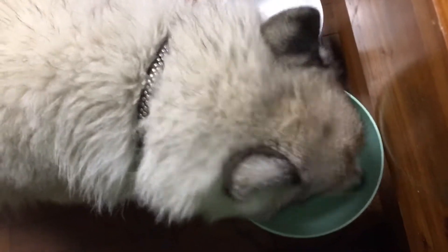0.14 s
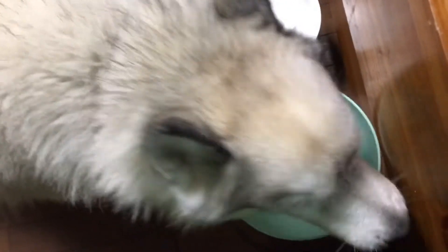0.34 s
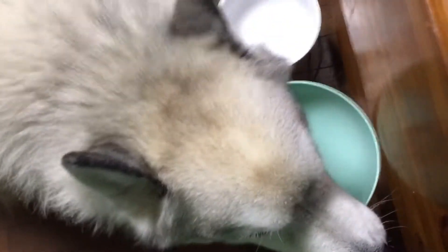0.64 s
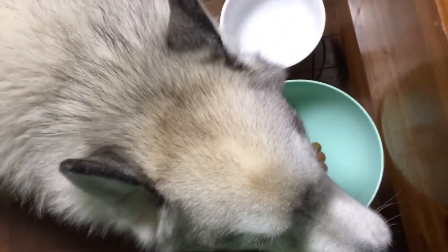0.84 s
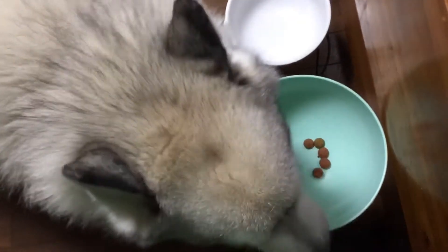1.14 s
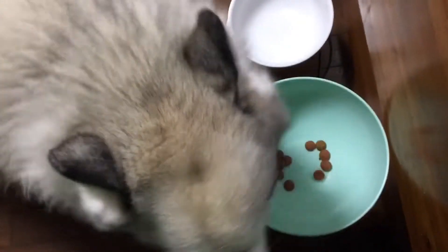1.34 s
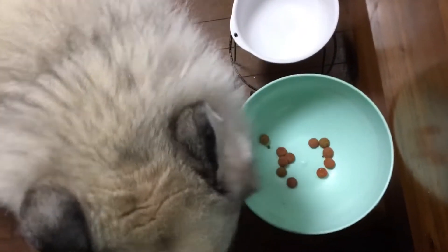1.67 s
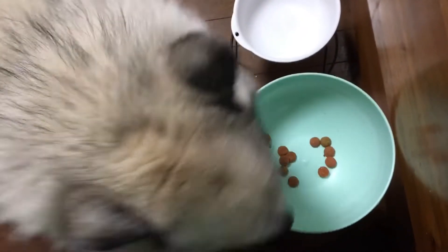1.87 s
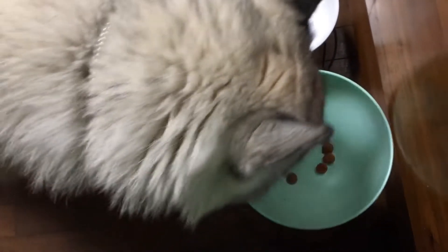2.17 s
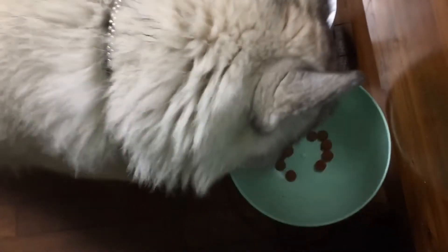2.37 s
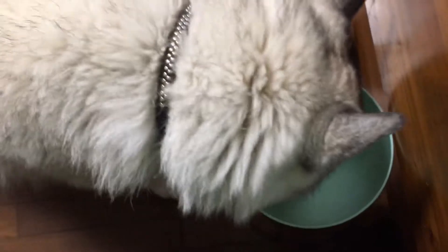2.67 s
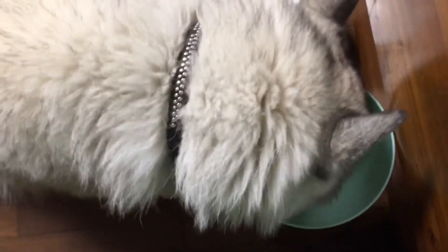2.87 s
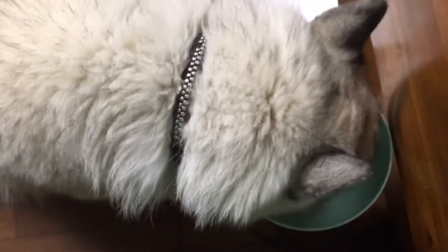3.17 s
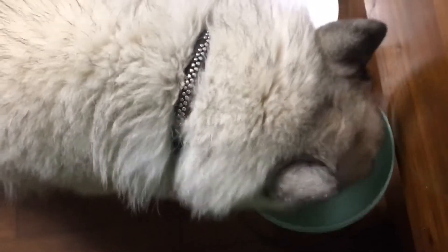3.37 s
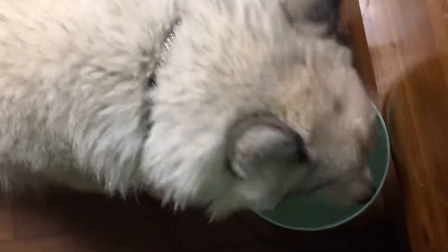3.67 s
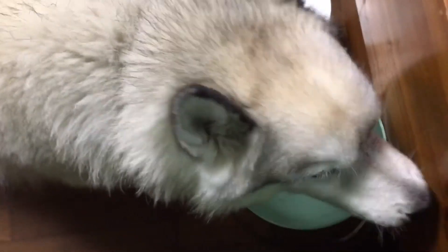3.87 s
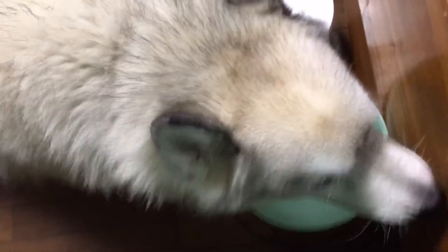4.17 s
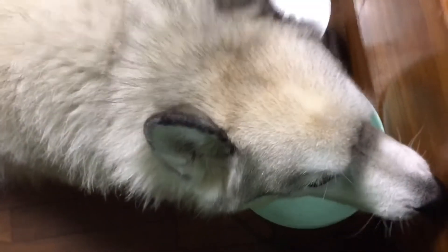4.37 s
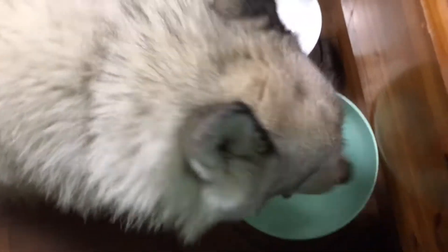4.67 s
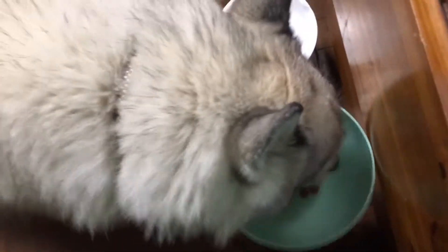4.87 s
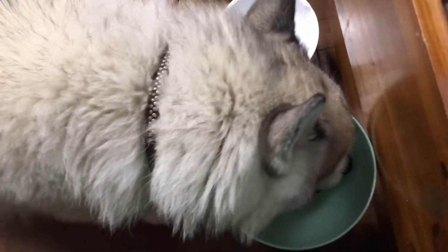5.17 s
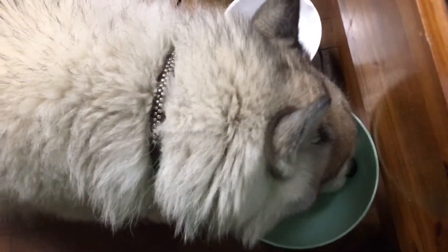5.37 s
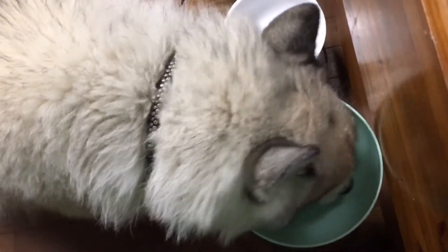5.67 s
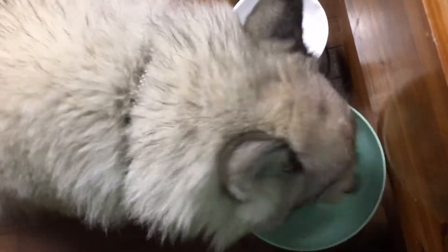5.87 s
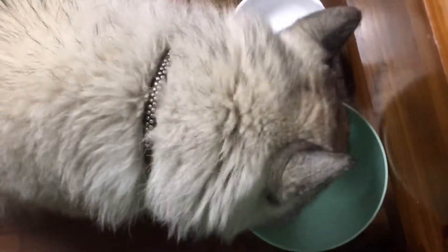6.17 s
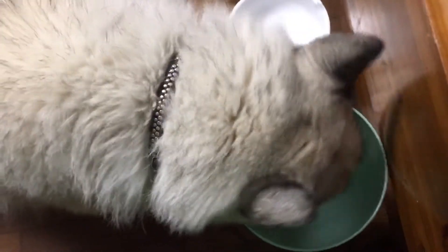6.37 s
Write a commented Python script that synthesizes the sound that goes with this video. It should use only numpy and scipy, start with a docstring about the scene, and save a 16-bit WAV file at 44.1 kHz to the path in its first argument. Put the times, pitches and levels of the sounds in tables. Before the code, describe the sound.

Close, uneven crunching and wet smacking as a dog eats pellets, its bowl and paws knocking on floorboards over a low household rumble.

```python
"""Crumbs grind in a dog's mouth over a low household rumble as it eats dry food from a plastic bowl.
Pellets snap between its teeth and tick in the bowl, each break ringing briefly at two pitches.
Paws and bowl knock the wooden floor and set the boards ringing. Wet tongue and lips click, and
tongue and fur rustle. A small room echoes the snaps, knocks and clicks, all heard through a phone
held just above the bowl."""
import sys
import numpy as np
from scipy import signal
from scipy.fft import rfft, irfft, next_fast_len
from scipy.io import wavfile
from scipy.ndimage import uniform_filter1d

SR = 44100
rng = np.random.default_rng(int(sys.argv[2]) if len(sys.argv) > 2 else 0)


def transcribe(u):
    """Save the signal u as a 16-bit wav file named by the first command-line argument.

    u: samples, shape (n,) or (channels, n), limited to [-1, 1]; the rate is SR.
    q: integer samples, one column per channel.
    """
    v = np.clip(np.atleast_2d(u).T, -1, 1)
    q = np.round(v * 32767).astype(np.int16)
    wavfile.write(sys.argv[1], SR, q)


N = 287091

# How loud the grinding crumbs, the tongue and fur rustle, and the household rumble are over time.
# Each row: time in seconds, level in dB.
GRIND_LEVELS = [(0, -43.5), (.14, -52), (.28, -47), (.45, -60), (.7, -50.5), (.83, -59.5), (1.2, -53),
                (1.55, -57), (2, -59.5), (2.45, -56.5), (2.72, -55.5), (2.8, -55), (3, -48.5),
                (3.12, -58.5), (3.3, -52.5), (3.6, -58), (3.8, -53.5), (4.4, -54.5), (5, -51),
                (5.42, -54.5), (5.6, -51.5), (5.78, -52), (5.92, -49), (6.1, -51), (6.51, -53)]
RUSTLE_LEVELS = [(0, -55.5), (.22, -58), (.33, -66.5), (.52, -59.5), (.64, -56), (.77, -57), (.83, -69),
                 (.92, -55.5), (1.02, -60), (1.12, -54.5), (1.32, -51.5), (1.5, -58.5), (1.88, -56.5),
                 (2, -62.5), (2.2, -60), (2.38, -60.5), (2.52, -64), (2.67, -49), (2.78, -59.5), (2.9, -53),
                 (3.13, -62), (3.35, -49.5), (3.5, -56.5), (3.63, -54.5), (3.72, -61.5), (4.02, -52),
                 (4.18, -51.5), (4.33, -56.5), (4.72, -52.5), (4.95, -51), (5.17, -53.5), (5.3, -50),
                 (5.5, -61.5), (5.7, -48.5), (5.85, -57.5), (6, -52), (6.18, -48), (6.35, -55.5),
                 (6.51, -52)]
RUMBLE_LEVELS = [(0.0, -45), (0.2, -42.5), (0.31, -42), (0.43, -49.5), (1.01, -48.5), (1.34, -48),
                 (1.54, -51.5), (2.21, -51.5), (2.59, -51.5), (2.7, -51), (3.48, -51.5), (3.9, -49),
                 (4.0, -49.5), (4.5, -48), (5.4, -54.5), (6.0, -46), (6.22, -50.5), (6.51, -55)]
# The tone of those three sounds, from bass to treble. Each row: frequency in Hz, relative level in dB.
GRIND_TONE = [(180, -4), (300, 0), (534, 0), (768, 1), (1350, -0.5), (1870, -0.5), (2790, -7), (3010, -5.5),
              (6000, -17), (7800, -43), (13200, -120)]
RUSTLE_TONE = [(880, -12), (1500, -5.5), (1850, -11.5), (2640, -7.5), (3920, -0.5), (4830, -7),
               (6120, -0.5), (7760, -4), (9100, -1.5), (10500, -9), (11400, -5.5), (14900, -11.5),
               (16000, -14)]
RUMBLE_TONE = [(15, -47), (25, 23.5), (37, 13), (54, 1), (65, 8), (82, -3.5), (192, 5.5), (345, -0.5),
               (472, -27), (549, -20), (600, -10), (657, -10), (900, -29), (1170, -59), (1980, -120)]
# The louder pellet snaps. Each row: start in seconds, level in dB, first pitch in Hz, second pitch
# in Hz, then the levels of the second pitch and of the crack, in dB compared with the first pitch.
PELLET_SNAPS = [(.0265, -36.5, 800, 2180, -1, -7), (.1507, -33, 1070, 1950, -21, -20),
                (.1942, -26, 1800, 1060, -0.5, -9), (.2325, -21.5, 1280, 2250, 0.5, -8),
                (.2456, -19, 637, 1180, -2, -8), (.257, -21, 1260, 670, -1, -11),
                (.2757, -31.5, 686, 1770, 3, -22), (.5597, -30.5, 3320, 760, -7, -10),
                (.6158, -39.5, 736, 3330, -3, 5), (.6242, -37, 1110, 2400, -6, -5),
                (.644, -31.5, 1160, 840, -8, -1), (.696, -41, 1160, 2430, -12, 4.5),
                (.7358, -37.5, 1660, 3950, -6, 2.5), (.766, -33.5, 1560, 2400, -2, 0.5),
                (.7731, -38.5, 1440, 3640, 2.5, 0), (.789, -41, 2120, 1390, -4, -1),
                (.8514, -37, 2200, 3770, 2.5, 1.5), (.8712, -33.5, 2460, 1070, -2, -6),
                (.884, -34, 1370, 925, -11, -6), (.9094, -41, 3650, 1420, 4, -2),
                (.9412, -28, 3000, 1910, -24, 3), (.9533, -30.5, 4400, 1230, -2, -5),
                (1.037, -44, 1710, 3000, -14, 10), (1.0648, -30.5, 1600, 824, -8, -4),
                (1.0911, -33.5, 2540, 1400, -18, -1), (1.1122, -30.5, 1590, 2260, -6, -2),
                (1.1416, -25, 1470, 746, -11, -9.5), (1.2975, -35, 1760, 2400, 1, 4.5),
                (1.3364, -35.5, 1410, 2500, -3, -11), (2.2817, -34, 1270, 3080, -3, -1.5),
                (2.2921, -36.5, 1540, 790, -4, -2), (2.4337, -31.5, 3650, 1900, -5, 8),
                (2.541, -40, 1330, 3500, -25, -19), (2.728, -33, 786, 1230, -4, -7),
                (2.733, -31.5, 1760, 1210, -2, -20), (2.7418, -30, 1710, 790, 0.5, -23),
                (2.7496, -29.5, 795, 1790, -7.5, -23), (2.8251, -39.5, 770, 2000, -2, 2),
                (2.8529, -39.5, 686, 1950, 0.5, -8), (2.9167, -38, 1990, 4200, -5, 0),
                (2.9205, -26.5, 1920, 5170, -10, -4.5), (2.9642, -30, 1860, 800, -10, -7),
                (3.0031, -33, 850, 1730, 2, -17), (3.012, -30, 1010, 1880, -15, -17),
                (3.031, -43, 1700, 750, -11, -11), (3.0414, -29, 1940, 960, -1, -6.5),
                (3.05, -30.5, 1010, 1740, -13, -6), (3.1565, -32, 805, 1950, -2.5, -27),
                (3.217, -32.5, 1640, 2620, -3, -5), (3.2245, -36, 736, 1110, -14, -23),
                (3.2278, -21.5, 1590, 800, -9, -3), (3.2471, -37, 810, 1980, 2, -16),
                (3.2572, -39, 1340, 2480, 5.5, 5), (3.289, -40, 1380, 4300, -10, 10.5),
                (3.3242, -28, 1140, 2000, -1, -18), (3.3463, -25, 1580, 1100, 1, -22),
                (3.4058, -32.5, 1080, 1870, -2.5, -8), (3.7137, -37.5, 670, 1170, 3, -17),
                (3.7186, -34, 1070, 666, -7, -10), (3.8292, -33.5, 1330, 960, -26, -3.5),
                (3.9454, -40, 1500, 2220, -9, -1), (4.1185, -22, 2860, 1330, -6, -3.5),
                (4.134, -42, 2200, 1160, -10, -1), (4.268, -39, 1140, 2360, -6, -7),
                (4.405, -33, 2700, 2110, 0.5, 6.5), (4.6404, -37, 1110, 1570, -19, -21),
                (4.7283, -46, 1780, 1220, -1, 10), (4.8734, -39, 725, 1900, -3, -8),
                (5.0796, -37, 3270, 1370, -11, 2), (5.1669, -31.5, 1340, 2170, -9, -20),
                (5.349, -35, 1640, 2970, -4, -4), (5.3574, -29.5, 2150, 2930, -7, -16),
                (5.4397, -38.5, 1100, 2070, -5, 0), (5.4502, -36.5, 2180, 980, -20, -7),
                (5.4862, -31.5, 880, 1570, -8, -9), (5.4987, -31, 1610, 700, -17, -18),
                (5.5128, -35, 2150, 710, -16, -11), (5.5331, -21, 2000, 1520, -23, -14),
                (5.536, -12.5, 2410, 1700, -5.5, -7), (5.5427, -16.5, 2400, 1730, -12, -14.5),
                (5.6104, -25.5, 1790, 810, -5, -1.5), (5.7145, -31.5, 1370, 2750, -4, 1.5),
                (5.8305, -33.5, 1340, 1940, 4, -16), (5.864, -22, 670, 1080, 0, -20),
                (5.8693, -31, 660, 1040, 5, -22), (5.8778, -28, 1120, 1950, 2, -24),
                (5.8855, -23.5, 1130, 2830, -16, -22), (5.8942, -24.5, 1160, 700, -4, -17),
                (6.3604, -33, 1930, 3840, -5, -21)]
# Knocks on the floor, most in short runs of bounces. Each row: start in seconds, level of the low
# notes in dB, then the levels of the deep, middle and upper notes, in dB compared with the low ones.
FLOOR_KNOCKS = [(.029, -37.5, -30, -4, 1), (.07, -38.5, -32, -5, -13), (0.193, -33.5, -12, -2, 4.5),
                (.218, -29, 6, -19, -3), (.231, -25.5, -8, 3, 4), (.244, -28, -20, 8.5, 7.5),
                (.256, -30, -11, -1, 3), (.269, -37, -14, -8, 10.5), (.299, -40, -13, -3, 5),
                (0.32, -34.5, 3, -3, -4), (0.628, -35.5, -24, -14.5, -8), (0.997, -40, -23, -5, -1),
                (1.445, -38, -23, -26, -7), (2.431, -29.5, -21, -10, -12), (2.444, -33, -15, -27, -31),
                (2.539, -42, -6, -6, -7), (3.322, -39, -14, 7.5, 4), (3.344, -26, -21, 1.5, -5),
                (3.358, -26.5, -9, -7.5, -16), (3.38, -33.5, -27, -22, -13), (3.72, -30, -38, 2, -7.5),
                (3.739, -43, -34, -13, -21), (3.786, -38, -32, -9, -7), (5.799, -46, 11.5, -6, -9),
                (5.83, -31, -20, -2, -6), (5.866, -27.5, -25, 0.5, 3.5), (5.869, -25, -31, -12, -8),
                (5.885, -34.5, -18, 6.5, -2), (5.909, -34.5, -25, 3, 0), (5.928, -29.5, -31, -20, -12)]
# The notes that boards and bowl ring at. Each row: pitch in Hz, relative strength in dB, fade time
# in seconds. Fade times in seconds are how long a sound takes to drop by 60 dB.
BOARD_NOTES = [(58.1, -8, 0.47), (76.5, -0.5, .08), (128.8, -6, 0.2), (194, 5.5, 0.083), (269.5, 2, 0.089),
               (417, -0.5, 0.072), (519, -0.5, 0.055), (640, -2, 0.021), (868, 2, 0.037),
               (1000, -16, 0.027), (1118, -3, 0.061), (1356, 4, 0.015), (1960, 3, 0.018),
               (2347, 8.5, 0.0078), (2840, -3, 0.008)]
# The three borders, in Hz, between the deep, low, middle and upper notes.
NOTE_BORDERS_HZ = [100, 330, 700]
# The louder wet clicks of tongue and lips. Each row: start in seconds, level in dB, pitch in Hz.
LIP_SMACKS = [(.0417, -34.5, 12100), (.7265, -37, 8000), (.789, -33, 7340), (.9189, -31, 6700),
              (1.1932, -36, 5830), (1.259, -32, 6130), (1.905, -38, 8700), (2.6548, -31, 7750),
              (2.693, -27.5, 7900), (2.7045, -33, 6500), (2.7818, -31, 12000), (3.362, -32.5, 9500),
              (3.6527, -33, 7200), (3.8332, -31, 7440), (3.962, -29.5, 8800), (4.049, -35, 9600),
              (4.3494, -37, 11600), (4.394, -30, 9100), (5.0766, -28.5, 7800), (5.092, -28, 8900),
              (5.446, -36, 6600), (5.5896, -33, 5300), (5.9487, -37, 5800), (6.03, -43, 6400),
              (6.1156, -27, 8750), (6.1647, -32, 6300), (6.179, -31, 8500), (6.1852, -26.5, 5800)]


def gain(db):
    """Turn a level in dB into a number to multiply by."""
    return 10 ** (np.asarray(db) / 20)


def normalise(x):
    """Scale a signal to an average power of 1."""
    return x / np.sqrt(np.mean(x ** 2))


def level_curve(levels):
    """Join a table's levels with straight lines, giving dB for every sample."""
    times, db = np.transpose(levels)
    return np.interp(np.arange(N) / SR, times, db)


def filtered(x, order, hz, kind):
    """Keep the "low", "high" or "band" part of a sound; a higher order cuts more sharply."""
    return signal.sosfilt(signal.butter(order, hz, kind, fs=SR, output="sos"), x)


def shape_tone(x, tone):
    """Turn each frequency up or down by a tone table, then normalise."""
    hz, db = np.transpose(tone)
    size = next_fast_len(N)
    all_hz = np.maximum(np.arange(size // 2 + 1) * SR / size, 1)
    gains = gain(np.interp(np.log(all_hz), np.log(hz), db))
    return normalise(irfft(rfft(x, size) * gains, size)[:N])


def ring(x, hz, fade_s):
    """An object shaken by x rings at one pitch and fades."""
    pole = np.exp((2j * np.pi * hz - np.log(1000) / fade_s) / SR)
    return signal.lfilter([1], [1, -pole], x).imag


def waver(per_s):
    """Glide to a new random value per_s times a second; the typical size is 1."""
    hold = int(SR / per_s)
    steps = np.repeat(rng.standard_normal(N // hold + 1), hold)
    return normalise(uniform_filter1d(steps, hold)[:N])


def place(out, start, sound, db):
    """Mix in a sound at start seconds, with its peak at db."""
    i = int(start * SR)
    n = min(len(sound), N - i)
    out[i:i + n] += gain(db) * sound[:n] / np.abs(sound).max()


def faint_events(levels, above_db, count, scatter_db=3):
    """Random starts, levels above a chewing layer, and four spare dice (0 to 1) for each event."""
    dice = rng.random((count, 6)).T
    starts = dice[0] * (N - 1) / SR
    layer_db = level_curve(levels)[(starts * SR).astype(int)]
    return starts, layer_db + above_db - scatter_db * np.log(1 - dice[1]), dice[2:]


def crackle(per_s, scatter_db, burst_ms, hiss):
    """Tiny breaks of uneven size, each a burst of noise lasting about burst_ms, over an even hiss."""
    happens = rng.random(N) < per_s / SR
    sizes = gain(scatter_db * np.minimum(rng.exponential(size=N), 3))
    bursts = signal.lfilter([1], [1, -np.exp(-1000 / (burst_ms * SR))], happens * sizes)
    return normalise(bursts * rng.standard_normal(N)) + hiss * rng.standard_normal(N)


def grind():
    """Crumbs break in the mouth in many tiny bursts."""
    crumbs = crackle(per_s=200, scatter_db=1.0, burst_ms=3.6, hiss=0.92)
    return shape_tone(crumbs, GRIND_TONE) * gain(level_curve(GRIND_LEVELS) + 2.25 * waver(25))


def rustle():
    """Tongue and fur make a finer, brighter crackle that swells with each mouthful."""
    brushing = crackle(per_s=340, scatter_db=-1.0, burst_ms=1.0, hiss=1.32)
    return shape_tone(brushing, RUSTLE_TONE) * gain(level_curve(RUSTLE_LEVELS) + 1.6 * waver(25))


def rumble():
    """Low household noise that wavers."""
    noise = rng.standard_normal(N)
    return shape_tone(noise, RUMBLE_TONE) * gain(level_curve(RUMBLE_LEVELS) + 0.2 * waver(21))


def snaps(break_ms=0.58, crack_ms=1.0, rise_s=0.00174, ring_cycles=10.6, tail_fade_s=0.024):
    """A breaking pellet rings itself and the jaw or bowl at two pitches, with a dry crack on top."""
    out, t = np.zeros(N), np.arange(4000) / SR
    starts, levels, dice = faint_events(GRIND_LEVELS, above_db=9.5, count=32)
    faint = zip(starts, levels, 700 * 3 ** dice[0], 1300 * 3 ** dice[1], -12 * dice[2], 3 - 15 * dice[3])
    for start, db, hz, second_hz, second_db, crack_db in PELLET_SNAPS + list(faint):
        break_noise, crack_noise, tail_noise = rng.standard_normal((3, len(t)))
        fracture = break_noise * np.exp(-t * 1000 / break_ms)
        fade_s = ring_cycles / hz
        for pitch, level in (hz, db), (second_hz, db + second_db):
            # passing through a second, quickly fading body makes the ring swell briefly
            place(out, start, ring(ring(fracture, pitch, rise_s), pitch, fade_s), level)
        # the bowl keeps the first pitch sounding faintly afterwards
        crumbs = tail_noise * gain(-60 * t / tail_fade_s)
        place(out, start, ring(crumbs, hz, fade_s / 2), db - 20)
        # louder snaps crack lower, by 78 Hz for each dB, with some random spread
        crack_hz = (4500 - 78 * (db + 35)) * np.exp(0.21 * break_noise[-1])
        burst = crack_noise * t * np.exp(-t * 1000 / crack_ms)
        crack = filtered(burst, 2, [0.55 * crack_hz, 1.59 * crack_hz], "band")
        place(out, start, crack, db + crack_db)
    # pellets are too small to give off bass
    return filtered(out, 2, 450, "high")


def knocks(push_ms=0.72, scuff_ms=4.63, rattle_fade_s=0.34, treble_fade_s=0.049):
    """A padded push rings the boards' lower notes, its scuff the higher; bowl and pellets rattle on."""
    out, t = np.zeros(N), np.arange(SR // 2) / SR
    push = t * np.exp(-t * 1000 / push_ms)
    for start, db, deep_db, middle_db, upper_db in FLOOR_KNOCKS:
        detunes = rng.standard_normal(len(BOARD_NOTES))
        noise = rng.standard_normal(len(t))
        scuff = noise * t * np.exp(-t * 1000 / scuff_ms)
        groups = np.zeros((4, len(t)))  # deep, low, middle, upper
        for (hz, note_db, fade_s), detune in zip(BOARD_NOTES, detunes):
            blow = scuff if hz > NOTE_BORDERS_HZ[1] else np.sign(detune) * push
            note = ring(blow, hz * (1 + 0.02 * detune), fade_s)
            groups[np.searchsorted(NOTE_BORDERS_HZ, hz)] += gain(note_db) * note
        # the low notes carry no deep bass below about 115 Hz
        groups[1] = filtered(groups[1], 2, 115, "high")
        for group, share_db in zip(groups, (deep_db, 0, middle_db, upper_db)):
            place(out, start, group, db + share_db)
        dull_rattle = filtered(noise, 1, [500, 2600], "band") * gain(-60 * t / rattle_fade_s)
        bright_rattle = filtered(noise, 1, [2600, 7000], "band") * gain(-2 - 60 * t / treble_fade_s)
        place(out, start, dull_rattle + bright_rattle, db - 18)
    return out


def smacks(burst_ms=0.31, fade_s=0.00081):
    """Thin films of saliva part with a very short, high tick."""
    out, t = np.zeros(N), np.arange(300) / SR
    starts, levels, dice = faint_events(RUSTLE_LEVELS, above_db=12, count=45)
    faint = zip(starts, levels, 5500 * 1.94 ** dice[0])
    for start, db, hz in LIP_SMACKS + list(faint):
        burst = rng.standard_normal(len(t)) * t * np.exp(-t * 1000 / burst_ms)
        place(out, start, ring(burst, hz, fade_s), db)
    return out


def room(x, delay_s=0.003, fade_s=0.22, top_hz=4450, level_db=-13):
    """The small room sends back a blur of dull echoes just after each sound."""
    t = np.arange(SR // 2) / SR
    echoes = rng.standard_normal(len(t)) * gain(-60 * t / fade_s) * (t > delay_s)
    echoes = filtered(echoes, 1, top_hz, "low")
    echoes /= np.sqrt(np.sum(echoes ** 2))
    return gain(level_db) * signal.fftconvolve(x, echoes)[:N]


def scene():
    """Mix everything into one channel; only the sharp sounds get an echo."""
    hits = snaps() + smacks() + knocks()
    return (hits + room(hits) + grind() + rustle() + rumble())[None]


def record(dry, bottom_hz=44, top_hz=15800):
    """The phone cuts the deepest bass and the highest treble."""
    treble_cut = signal.ellip(10, 0.2, 70, top_hz, fs=SR, output="sos")
    return signal.sosfilt(treble_cut, filtered(dry, 6, bottom_hz, "high"))


dry = scene()
out = record(dry)
transcribe(out)
```